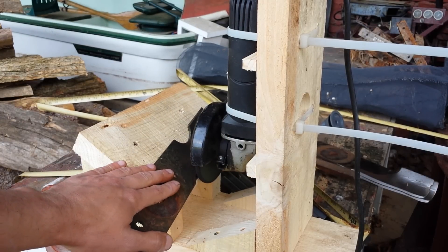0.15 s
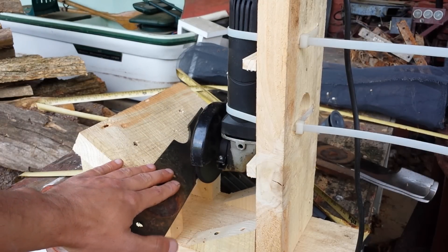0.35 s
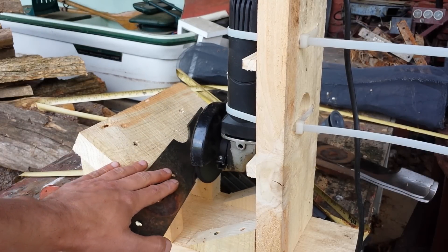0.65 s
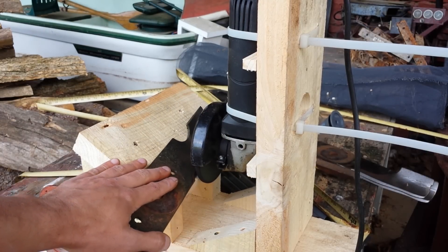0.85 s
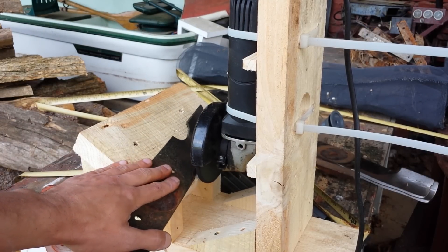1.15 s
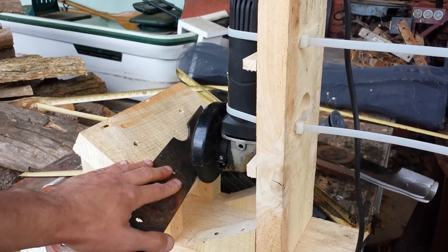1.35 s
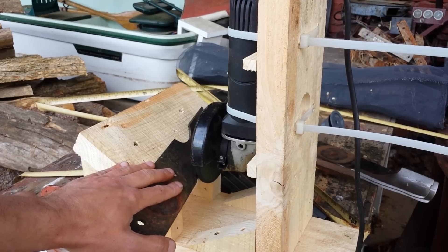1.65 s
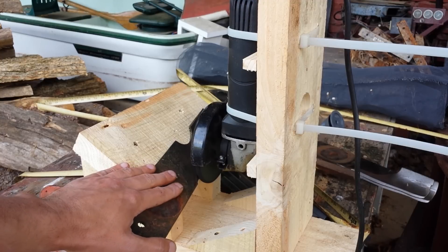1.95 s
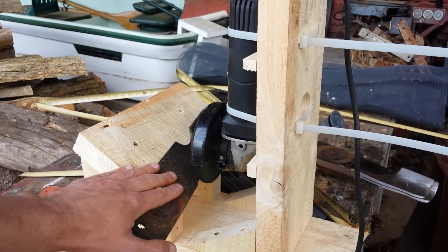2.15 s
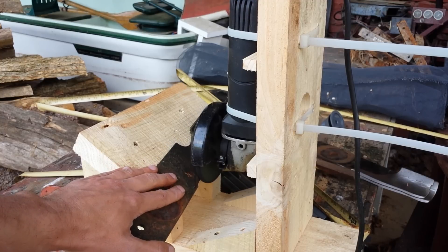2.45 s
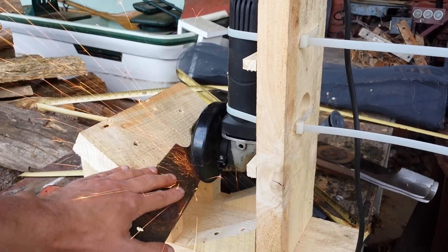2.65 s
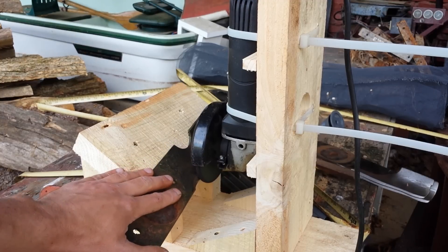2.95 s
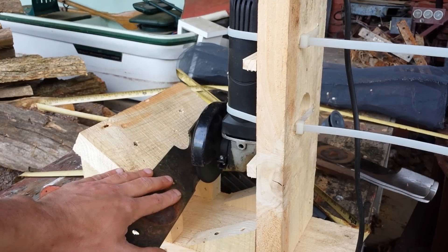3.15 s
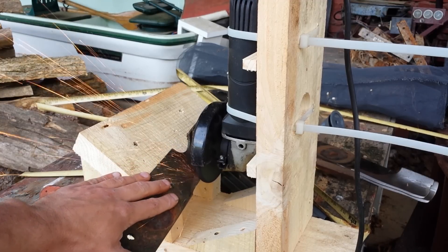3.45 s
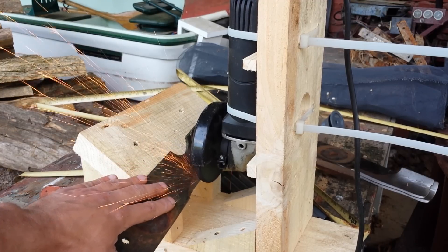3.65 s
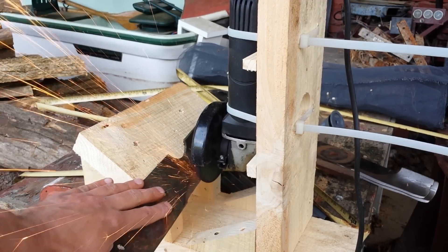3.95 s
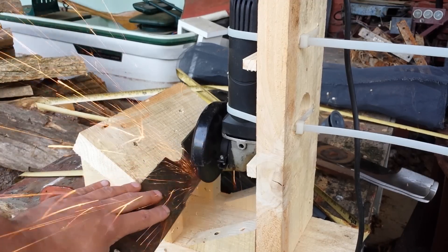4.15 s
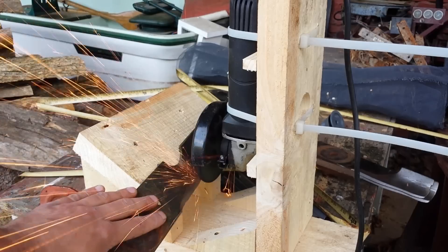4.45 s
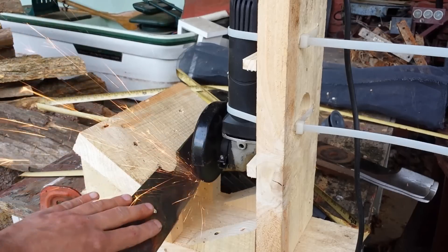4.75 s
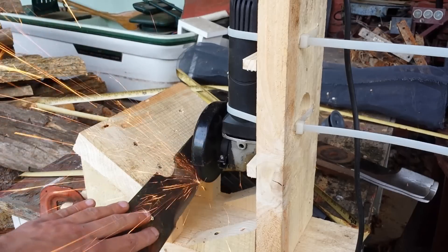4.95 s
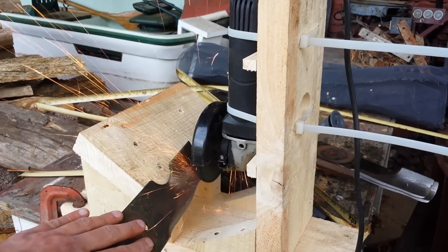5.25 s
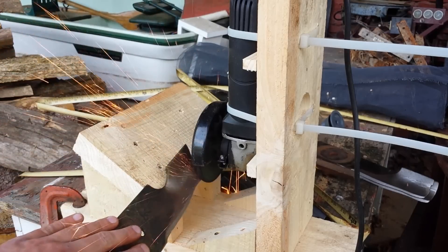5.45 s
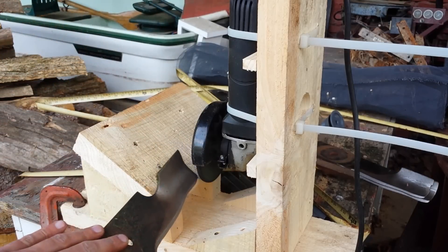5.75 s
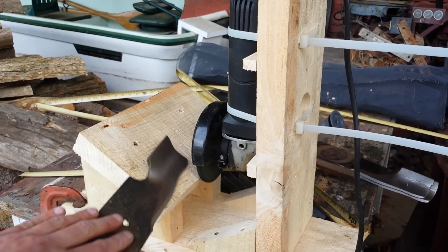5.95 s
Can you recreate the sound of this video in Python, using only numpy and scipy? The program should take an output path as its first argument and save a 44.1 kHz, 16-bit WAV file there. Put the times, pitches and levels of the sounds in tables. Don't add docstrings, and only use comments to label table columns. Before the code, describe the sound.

Close stereo capture in an outdoor workshop. An angle grinder is already running, a dense, rough gear whine over low motor hum, climbing very slightly in pitch. A steel blade meets the wheel for a brief piercing rasp, lifts, then is drawn along it in a long ringing screech with gritty chatter. The motor seems quieter under the grinding and returns at the end.

```python
import sys
import numpy as np
from scipy import signal
from scipy.fft import rfft, irfft, next_fast_len
from scipy.io import wavfile
from scipy.ndimage import uniform_filter1d, map_coordinates

SR = 44100
rng = np.random.default_rng(int(sys.argv[2]) if len(sys.argv) > 2 else 0)


def linear_from_db(decibels):
    return 10 ** (np.asarray(decibels, float) / 20)


def output_pcm(signal):
    pcm = np.clip(np.atleast_2d(signal).T, -1, 1) * 32767
    wavfile.write(sys.argv[1], SR, np.round(pcm).astype(np.int16))


N = 269451

# t/s, speed/(turns/s)
SPEED = [(0, 132.2), (.8, 133.2), (1.6, 135.2), (2.6, 136.8), (2.9, 136.3), (3.4, 138.2), (3.95, 137.6),
         (4.6, 138.1), (5.6, 138.3), (5.9, 140.4), (6.11, 140.8)]
# t/s, gain/dB
GAIN = [(0, .5), (.05, 0.5), (.4, -1), (.6, 0), (2.57, 0), (2.65, -3.5), (2.82, -5), (2.95, -2),
        (3.35, -1.5), (3.55, -5), (4.25, -5), (4.76, -5), (5.67, -4.5), (5.8, -2), (6.0, -1.5), (6.11, -2)]
# t/s, share/1
LEAN = [(0, -0.083), (2.5, 0.09), (2.65, 0.76), (3.4, .6), (4.2, 1), (5.7, 1), (5.9, 0.26), (6.11, -0.44)]
# multiple/1, level/dB, left-right/dB
ORDERS = [(2, -10, 1), (2.66, -7, 7), (3, -2.5, -3.5), (4, -8, 2.5)]
# t/s, half length/s, level/dB
JIG_DAMPED = [(1.4, .75, -10), (2.84, 0.18, -5), (4.2, 0.18, -8), (3.75, 0.18, -5), (4.9, 0.36, -1.5)]
# f/Hz, density/dB
RUMBLE_L = [(25, -58), (70, -35), (200, -12.5), (400, -4), (900, -1), (1300, -6), (1900, 3.5), (2250, -8.5),
            (2600, -36)]
RUMBLE_R = [(25, -58), (70, -5), (200, -8.5), (400, 0.5), (800, -5.5), (1150, -1), (1450, 4.5), (1900, 3.5),
            (2250, -1), (2600, -16.5)]
# f/Hz, density/dB
WHINE_L = [(2000, -27), (2300, -7.5), (2800, -3.5), (3150, -2), (3500, -4), (4600, 2), (5500, -3),
           (6500, -6.5), (7700, -13.5), (8000, -14), (8600, -30), (12300, -37), (12800, -51), (15500, -55)]
WHINE_R = [(2000, -36), (2300, -14), (2800, 1), (3150, -5), (3500, -0.5), (4300, 2), (5300, -8.5),
           (6400, -9.5), (6800, -4.5), (8200, -5), (10300, -12.5), (11300, -15.5), (13000, -19.5),
           (15500, -31)]
# multiple/1, left/dB, right/dB
MESH = (50, -9, -1)
# t/s, half length/s, level/dB
STUTTERS = [
    (.3, 0.12, -0.5),
    (2.045, 0.017, -3),
    (2.48, 0.017, -3.5),
    (3.13, 0.061, -3.5),
]
# f/Hz, width/Hz, left/dB, right/dB
CASING_RING = [(2513, 34, -43, -40), (2780, 65, -40.5, -42.5), (4050, 230, -58, -38),
               (5110, 50, -37.5, -38.5), (4550, 380, -45.5, -38)]
JIG_RING = [(794, 65, -56.5, -56.5), (940, 30, -49.5, -52)]
GUARD_RING = [(3727, 44, -39, -41)]
HOVER_RING = [(4090, 130, -49.5, -41.5)]
# f/Hz, phase wander/rad, left/dB, right/dB
GUARD_HUM = (3733, 2.2, -41, -45)
# t/s, level/dB
GUARD_SHADE = [(0, 2.5), (.6, 4), (1.1, 4.5), (2.7, 8.5), (2.9, 1), (3.7, 2.5), (4.0, 6), (5.4, 2.5),
               (5.7, 7), (6.11, 6)]
# t/s, half length/s, level/dB
HOVER = [
    (3.1, 0.32, 12.4),
]
# t/s, f/Hz, level/dB
HAND = [(0, 7220, -33), (.35, 7500, -49), (.7, 8180, -42), (1.9, 8200, -47), (2.3, 7980, -37.5),
        (2.7, 7800, -36), (3.0, 7500, -35.5), (3.17, 7280, -35), (3.4, 6920, -61), (5.7, 7800, -36),
        (5.9, 7600, -52), (6.11, 7460, -35)]

# t/s, level/dB
TOUCH = [
    (2.615, -52),
    (2.63, -40.5),
    (2.84, -37.5),
    (2.9, -54),
    (2.93, -67),
    (2.952, -45),
    (2.99, -68),
]
STROKE = [
    (3.4, -65),
    (3.415, -41),
    (3.83, -37.5),
    (4.18, -36),
    (4.61, -40),
    (5.2, -38),
    (5.45, -33.5),
    (5.705, -41),
    (5.73, -59),
]
# t/s, half length/s, level/dB
SKIPS = [(2.786, 0.0059, -7), (3.44, 0.045, -15), (3.68, 0.019, -8), (5.514, .006, -3), (5.593, .006, 2),
         (5.305, 0.0071, -2), (5.672, 0.0062, -17)]
# t/s, level/dB
BITES = [(2.797, -2.5), (3.419, 5), (3.44, 5), (3.454, 2), (3.69, 0), (3.705, 4), (5.523, 4), (5.612, 6),
         (5.682, -9)]
# t/s, half length/s, level/dB
LOW_NODES = [(2.63, 0.085, -9.5), (3.5, .18, -11), (3.92, .14, -12), (4.875, 0.036, -3),
             (5.122, 0.12, -3.5), (5.292, 0.024, -16), (5.415, 0.021, -9), (5.69, 0.045, -1)]
MAIN_NODES = [(2.83, .06, -4), (2.95, .05, -10), (4.9, 0.24, -12), (5.2, 0.081, -1.5), (5.55, 0.27, -9)]
HIGH_NODES = [(3.6, 0.25, -5), (4.18, 0.24, -9), (5.0, 0.12, -8), (5.3, 0.065, 1), (5.55, 0.16, -5)]
TIP_DB = (18, 16.5, 0)
BODY_DB = (11, 15.5, 10)
# f/Hz, phase wander/rad, left/dB, right/dB
SQUEAL = [(6095, 1.9, 1, -10), (7552, 1.7, -16, 3), (8885, 2.2, -20, 0)]
# f/Hz, width/Hz, left/dB, right/dB
LOW_RING = [(6090, 70, -1, -16), (6462, 30, -14, -10)]
MAIN_RING = [(3900, 70, -22, -26), (5015, 70, -11, -16), (5290, 52, -12, -23), (7640, 91, -17, -2),
             (7800, 130, -33, -1.5)]
HIGH_RING = [(8300, 50, -28, -23), (8790, 190, -14, 2), (9360, 40, -34, -4)]
TIP_RING = [(7500, 170, -10, 1), (8040, 280, -17, 0.5), (9600, 220, -25, -7.5), (11100, 100, -32, -15),
            (12230, 200, -34, -12)]
# f/Hz, width/Hz, left/dB, right/dB
EARLY_RING = [(10280, 130, -10, 4), (10750, 61, -16, -2), (11300, 35, -22, -6), (11550, 43, -20, 2.5),
              (12200, 120, -22, 4), (13300, 98, -28, 0), (13800, 130, -29, -6), (14400, 68, -26, -5),
              (15100, 210, -25, -3)]
MIDDLE_RING = [(9970, 110, -14, 6), (11700, 59, -20, -2), (12200, 180, -20, -2), (13200, 140, -25, -2),
               (14000, 270, -25, -1), (14500, 110, -20, 4)]
HEEL_RING = [(10200, 160, -22, 2), (12100, 60, -20, -12), (12100, 120, -18, -2), (13300, 100, -27, -2),
             (13900, 120, -25, -6), (14900, 90, -20, 1.5)]
# f/Hz, density/dB
SCRAPE_L = [(3000, -17.5), (4500, -2.5), (6000, 5), (7700, -9), (8300, -31), (9200, -20), (12300, -19),
            (13000, -27), (15500, -31)]
SCRAPE_R = [(3000, -20.5), (4500, -31), (5700, 3.5), (7600, 1), (9500, -5), (12300, -7.5), (13000, -13),
            (15500, -33)]
# t/s, level/dB
SPARKS = [
    (2.8, -32),
    (3.872, -39),
    (3.93, -47),
    (4.2, -46),
    (5.37, -33),
]

# f/Hz, likeness/1
ALIKE = [(60, 0.4), (140, 1), (300, 0.28), (700, 0.66), (1200, 0.42), (2700, 0.83), (5000, 0.43),
         (9000, 0.4)]
# f/Hz, level over local mean/dB
MASK_L = [(1900, -16), (2250, -6), (2600, -14), (3100, -9), (3600, -20), (7800, -20), (8400, 3), (9300, 0),
          (12300, -1), (12800, 3), (15500, 4)]
MASK_R = [(1900, -16), (2250, -7), (2600, -14), (3100, -9), (3600, -24), (9500, -24), (11000, -5),
          (12300, -3), (12800, 1), (13600, -1), (15500, 0)]

HUM_DB, RUMBLE_DB, WHINE_DB = -41, -36, -25
HUM_DUCKS, WHINE_DUCKS = 1.1, 0.98
ARMATURE_DB, ARMATURE_DB_PER_TURN = -5, 1.27
THIRD_DB, LEAN_DAMPS_DB = -3.5, -10
JIG_RISES_DB = 0.83
TOUCH_END_S = 3.2
LEFT_LAG_S = 2 / SR


def unit(x):
    return x / np.sqrt(np.mean(x ** 2) + 1e-20)


def along(points, hz):
    f, v = np.transpose(points)
    return np.interp(np.log(hz + 1), np.log(f + 1), v)


def curves(rows):
    s, *cols = np.transpose(rows)
    return [np.interp(np.arange(N) / SR, s, c) for c in cols]


def dips(rows, edge):
    t = np.arange(N) / SR
    return sum(db * np.exp(-np.abs((t - s) / half) ** edge) for s, half, db in rows)


def wobble(rate_hz):
    coarse = np.arange(0, N + 32, 32)
    knots = rng.standard_normal(int(N * rate_hz / SR) + 4)
    return np.interp(np.arange(N), coarse, map_coordinates(knots, [coarse * rate_hz / SR]))


def filtered(x, response):
    m = next_fast_len(N + 8192)
    return irfft(rfft(x, m) * response(np.fft.rfftfreq(m, 1 / SR)), m)[..., :N]


def heard(two, response):
    m = next_fast_len(N + 8192)
    hz = np.fft.rfftfreq(m, 1 / SR)
    a, b = rfft(two, m)
    turn = np.arccos(np.clip(along(ALIKE, hz), -1, 1)) / 2
    mid, side = a * np.cos(turn), b * np.sin(turn)
    return irfft(np.array([mid + side, mid - side]) * response(hz), m)[:, :N]


def patchy(patchy_db):
    z = signal.stft(rng.standard_normal((2, N)), nperseg=256)[2]
    field = uniform_filter1d(rng.standard_normal(z.shape[1:]), size=4, axis=0)
    field = uniform_filter1d(field, size=6, axis=1)
    return unit(signal.istft(z * linear_from_db(patchy_db * unit(field)), nperseg=256)[1][:, :N])


def rush(left, right, patchy_db):
    spectra = lambda hz: linear_from_db(np.array([along(left, hz), along(right, hz)]))
    x = heard(patchy(patchy_db), spectra)
    return x / np.std(x.mean(0))


def ringing(modes):
    c, w, *ports_db = np.transpose(modes)
    gains = linear_from_db(ports_db) * (-1) ** np.arange(len(c)) * np.sqrt(SR / (np.pi * w))
    peaks = lambda f: 1j * f * w[:, None] / (c[:, None] ** 2 - f * f + 1j * f * w[:, None])
    return heard(rng.standard_normal((2, N)), lambda f: gains @ peaks(f))


def squeal(hz, wander_rad, l_db, r_db):
    phase = 2 * np.pi * hz * np.arange(N) / SR + wander_rad * wobble(60)
    return np.sqrt(2) * linear_from_db(np.array([[l_db], [r_db]]) + 1.9 * wobble(40)) * np.sin(phase)


def high_spot(turns, rise, steady, scatter_db):
    whole, part = np.divmod(turns, 1)
    size, length = rng.standard_normal((int(whole[-1]) + 1, 2))[whole.astype(int)].T
    end = np.clip(1.21 + 0.5 * length, .4, 1)
    push = linear_from_db(scatter_db * size) * np.clip(part / rise, 0, 1) * np.clip((end - part) / 0.37, 0, 1)
    return unit(steady + uniform_filter1d(push, size=24))


def shaft_hum(turns, gain_db, speed):
    tone = lambda k: np.sqrt(2) * np.sin(2 * np.pi * k * turns + .1 * k * wobble(8))
    lean, = curves(LEAN)
    hum_db = HUM_DB + HUM_DUCKS * gain_db + .8 * wobble(4.52) + 0.45 * wobble(14)
    armature_db = ARMATURE_DB + ARMATURE_DB_PER_TURN * (speed - speed[0]) + dips(JIG_DAMPED, 1.4)
    third_db = THIRD_DB + LEAN_DAMPS_DB * lean
    hum = linear_from_db(hum_db) * tone(1) * linear_from_db(np.array([[.3], [-.3]]))
    for (k, db, pan_db), moved_db in zip(ORDERS, (0, armature_db, third_db, 0)):
        order_db = RUMBLE_DB + gain_db - 6.0 + db + moved_db + 1.9 * wobble(6)
        hum = hum + linear_from_db(order_db) * tone(k) * linear_from_db(np.array([[pan_db / 2], [-pan_db / 2]]))
    return hum


def housing_rumble(gain_db):
    rumble_db = RUMBLE_DB + gain_db + 0.34 + 0.18 * wobble(25.94)
    return linear_from_db(rumble_db) * rush(RUMBLE_L, RUMBLE_R, patchy_db=1.58)


def gear_whine(turns, gain_db, speed):
    whine_db = WHINE_DB + WHINE_DUCKS * gain_db + dips(STUTTERS, 1.1) + 0.13 * wobble(13)
    rattle_db = 0.12 * wobble(45) + 0.27 * wobble(80)
    rattle = linear_from_db(rattle_db) * high_spot(turns, rise=0.16, steady=4.0, scatter_db=4.5)
    whine = linear_from_db(-26.5) * rush(WHINE_L, WHINE_R, patchy_db=0.97)
    casing = ringing(CASING_RING)
    jig = linear_from_db(JIG_RISES_DB * (speed - speed[0])) * ringing(JIG_RING)
    guard_db = curves(GUARD_SHADE)[0] + 0.81 * wobble(25)
    guard = linear_from_db(guard_db) * (ringing(GUARD_RING) + squeal(*GUARD_HUM))
    mesh_db = np.array(MESH[1:])[:, None] - 39.5 + 2.2 * wobble(5)
    mesh = np.sin(2 * np.pi * MESH[0] * turns + 0.6 * wobble(40)) * linear_from_db(mesh_db)
    cavity = linear_from_db(dips(HOVER, 2.4)) * ringing(HOVER_RING)
    return linear_from_db(whine_db + 27.5) * rattle * (whine + casing + jig + guard + mesh + cavity)


def air_whistle():
    hz, db = curves(HAND)
    phase = 2 * np.pi * np.cumsum(hz) / SR
    band = wobble(600) * np.sin(phase) + wobble(600) * np.cos(phase)
    return unit(band) * linear_from_db(db + np.array([[-16], [5]]))


def grinder(turns):
    (gain_db,), (speed,) = curves(GAIN), curves(SPEED)
    motor = shaft_hum(turns, gain_db, speed) + housing_rumble(gain_db)
    return motor + gear_whine(turns, gain_db, speed) + air_whistle()


def blade_ring(pressure_db):
    touching = np.arange(N) / SR < TOUCH_END_S
    low_db, main_db, high_db = (
        pressure_db + np.where(touching, tip_db, body_db) + dips(nodes, 1.5) + 0.44 * wobble(22)
        for tip_db, body_db, nodes in zip(TIP_DB, BODY_DB, (LOW_NODES, MAIN_NODES, HIGH_NODES)))
    low, main, high = (squeal(*mode) for mode in SQUEAL)
    main = np.where(touching, ringing(TIP_RING), main + ringing(MAIN_RING))
    rings = linear_from_db(low_db) * (low + ringing(LOW_RING)) + linear_from_db(main_db) * main
    return rings + linear_from_db(high_db) * (high + ringing(HIGH_RING))


def grit_scrape(pressure_db):
    t = np.arange(N) / SR
    slide = np.clip((t - 4.15) / 0.48, 0, 2)
    upper = 0
    for k, modes in enumerate((EARLY_RING, MIDDLE_RING, HEEL_RING)):
        upper = upper + np.sqrt(np.clip(1 - np.abs(slide - k), 0, 1)) * ringing(modes)
    upper_db = pressure_db + np.where(t < TOUCH_END_S, -8.0, -3.0)
    return linear_from_db(upper_db) * upper + linear_from_db(pressure_db + 7.5) * rush(SCRAPE_L, SCRAPE_R, patchy_db=3.0)


def blade(turns):
    t = np.arange(N) / SR
    lifted = lambda s: [(s, -90)]
    pressure_db, = curves(lifted(2.57) + TOUCH + lifted(3.02) + lifted(3.38) + STROKE + lifted(5.8))
    bites = sum(linear_from_db(db) * (t > s) * np.exp(-np.abs(t - s) / 0.0029) for s, db in BITES)
    chatter = linear_from_db(dips(SKIPS, 4.7) + 0.16 * wobble(45))
    rub = chatter * high_spot(turns, rise=0.05, steady=0.38, scatter_db=3.0) + bites
    grit = chatter * high_spot(turns, rise=0.12, steady=0.51, scatter_db=2.5) + bites
    return rub * blade_ring(pressure_db) + grit * grit_scrape(pressure_db)


def sparks():
    t, taps = np.arange(SR // 20) / SR, np.zeros(N)
    for s, db in SPARKS:
        taps[round(s * SR)] = linear_from_db(db)
    push = np.sin(2 * np.pi * 120 * t) * np.exp(-t / 0.0024) * 6.0
    return signal.fftconvolve(taps, push)[:N] * np.array([[.08], [1]])


def scene():
    turns = np.cumsum(curves(SPEED)[0]) / SR
    return grinder(turns) + blade(turns) + sparks()


def thinned(x, uneven_db, floor_db):
    hz, _, z = signal.stft(x, SR, window="cosine", nperseg=2048)
    power = np.abs(z) ** 2
    local = uniform_filter1d(uniform_filter1d(power, size=40, axis=1), size=7, axis=2)
    luck = uniform_filter1d(rng.standard_normal((2, 33, z.shape[2])), size=4, axis=2)
    mask_db = np.array([along(MASK_L, hz), along(MASK_R, hz)])[..., None]
    step_db = mask_db + uneven_db * unit(luck)[:, np.arange(len(hz)) // 32]
    floor = linear_from_db(2 * floor_db) * np.clip((hz - 14000) / 1200, 0, 2)[:, None] ** 2
    step = np.maximum(local * linear_from_db(2 * step_db), floor)
    keep = (uniform_filter1d(power, size=3, axis=1) > step) | (hz < 1900)[:, None]
    return signal.istft(z * keep, SR, window="cosine", nperseg=2048)[1][:, :N]


def roll_off(x):
    return signal.sosfilt(signal.butter(12, 15710, fs=SR, output="sos"), x)


def record(dry):
    lag = lambda hz: np.exp(-1j * np.pi * hz * LEFT_LAG_S * np.array([[1], [-1]]))
    late = filtered(dry, lambda hz: lag(hz) * (hz > 28) * hz / (hz + 40))
    soft = late / (1 + np.abs(late / .52) ** 5) ** (1 / 5)
    mix = thinned(soft, uneven_db=3, floor_db=-66)
    return roll_off(mix)


dry = scene()
out = record(dry)
output_pcm(out)
```